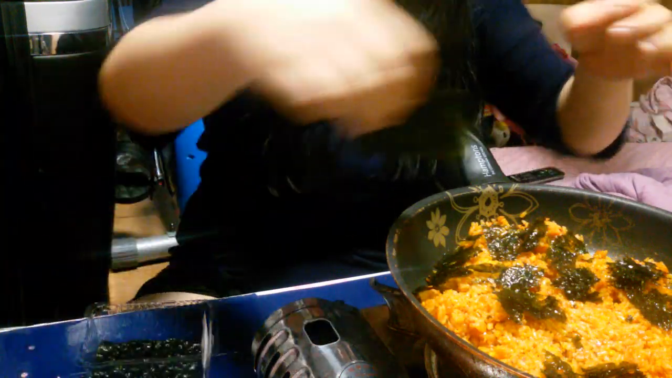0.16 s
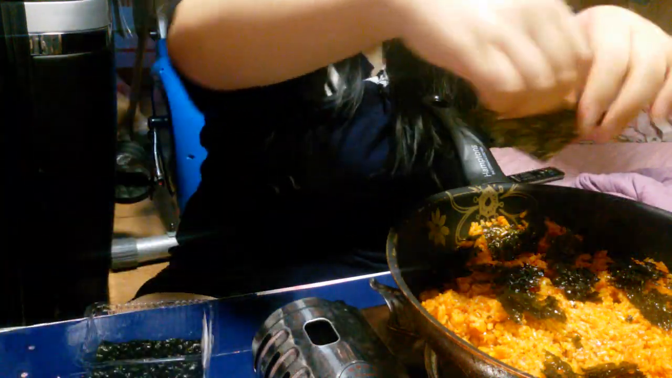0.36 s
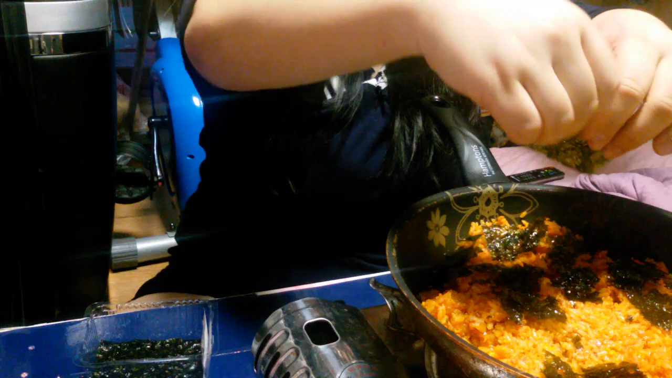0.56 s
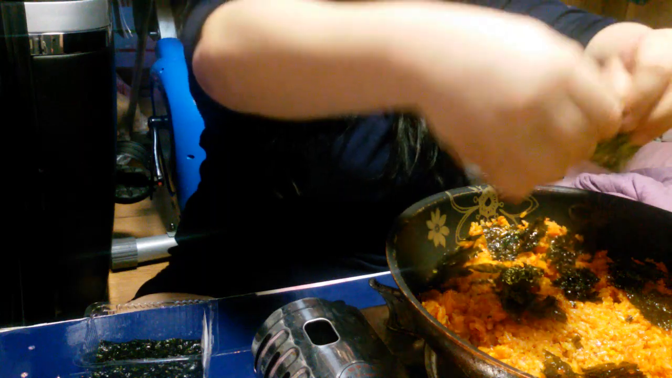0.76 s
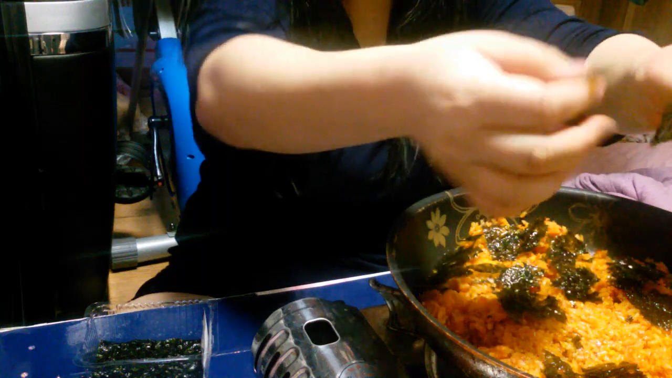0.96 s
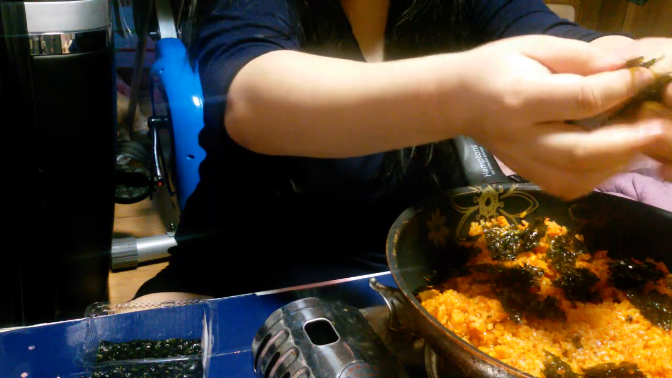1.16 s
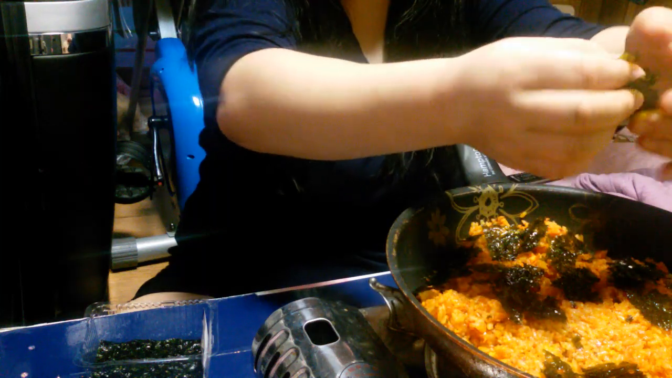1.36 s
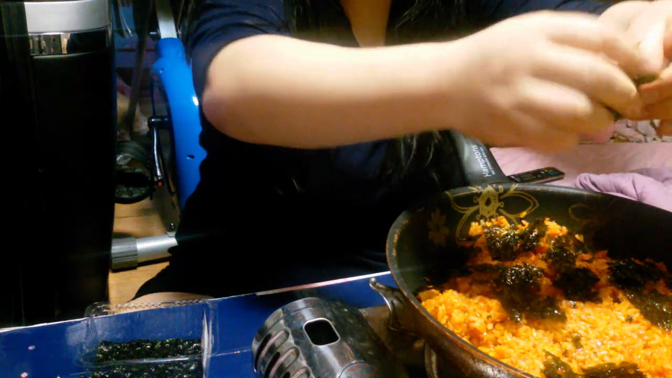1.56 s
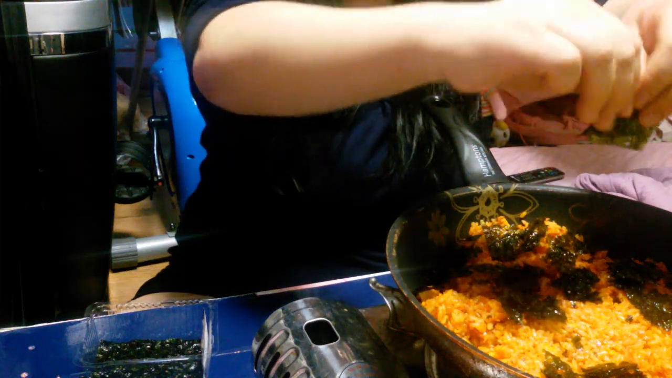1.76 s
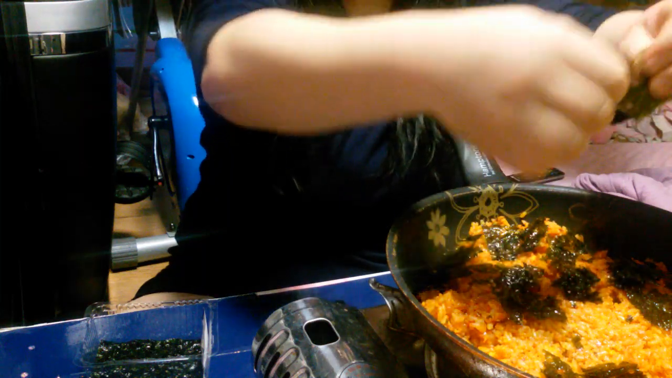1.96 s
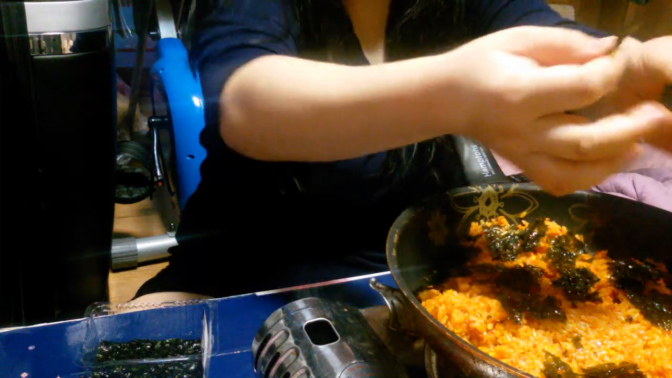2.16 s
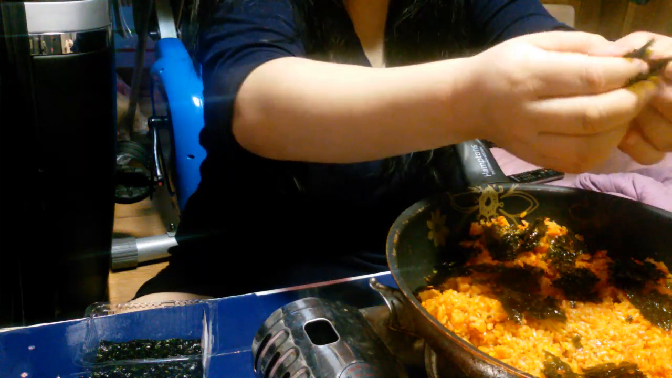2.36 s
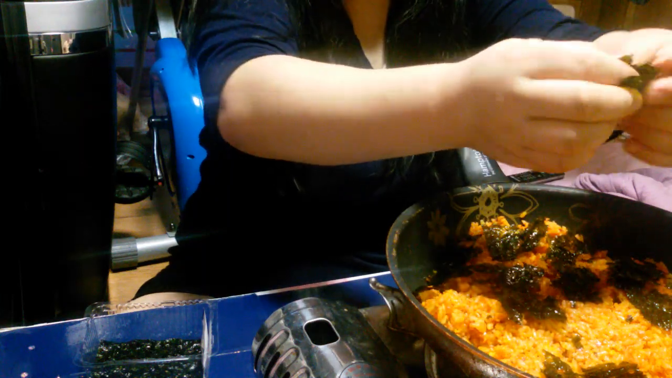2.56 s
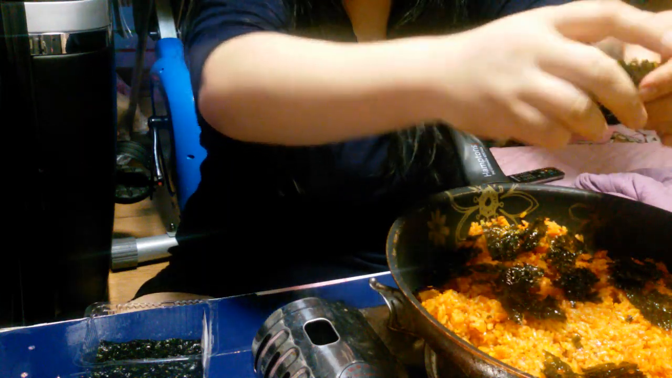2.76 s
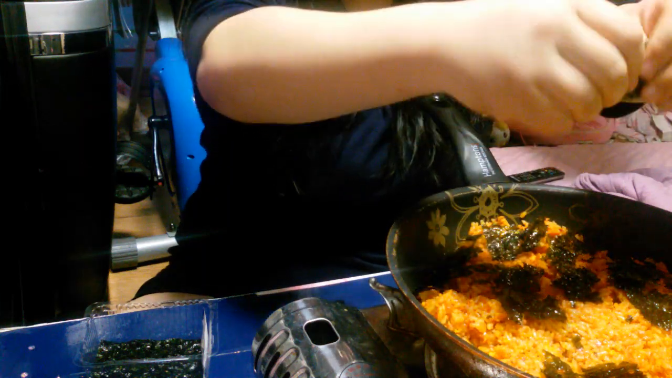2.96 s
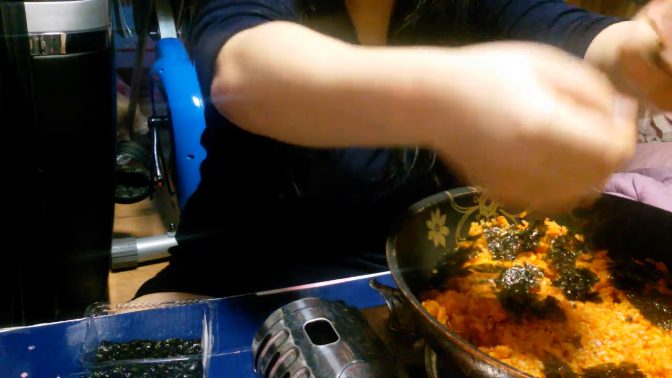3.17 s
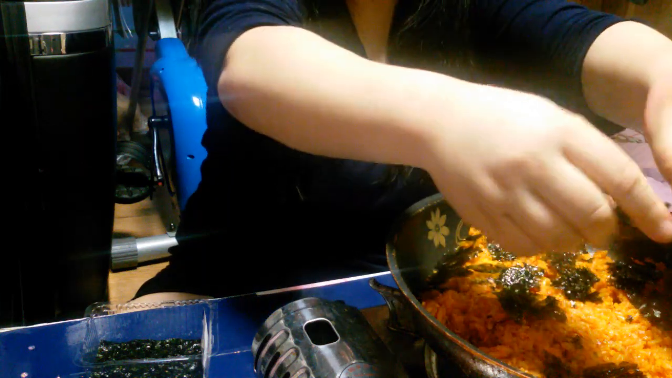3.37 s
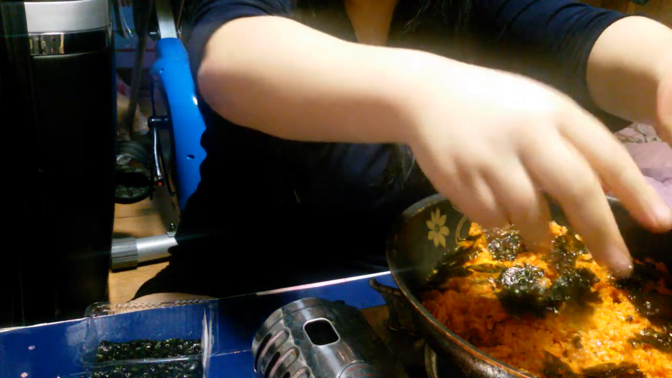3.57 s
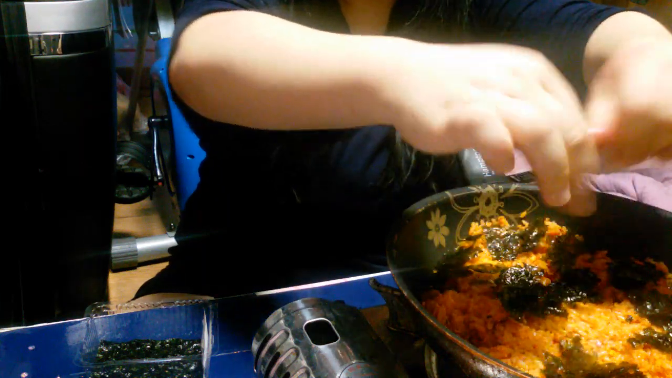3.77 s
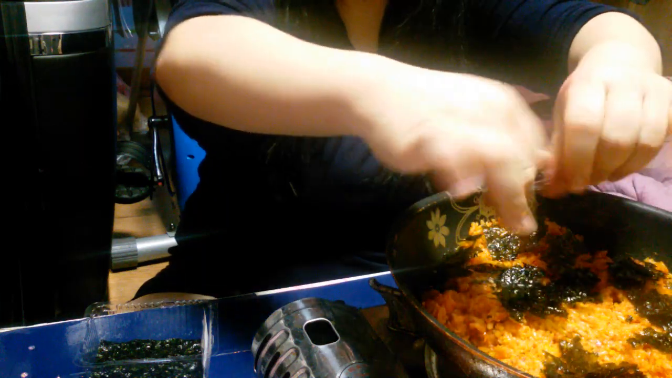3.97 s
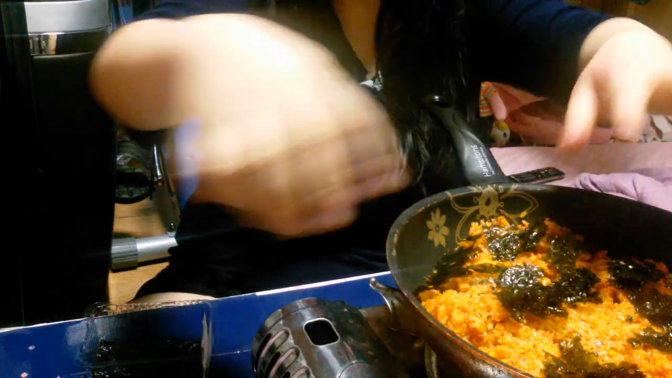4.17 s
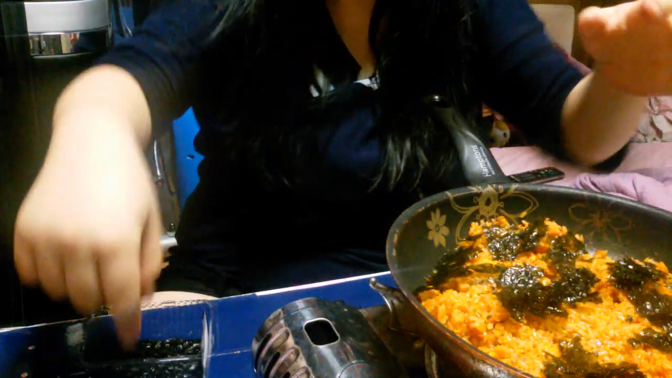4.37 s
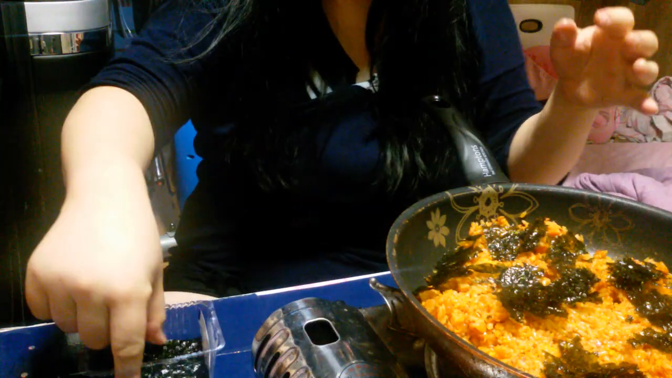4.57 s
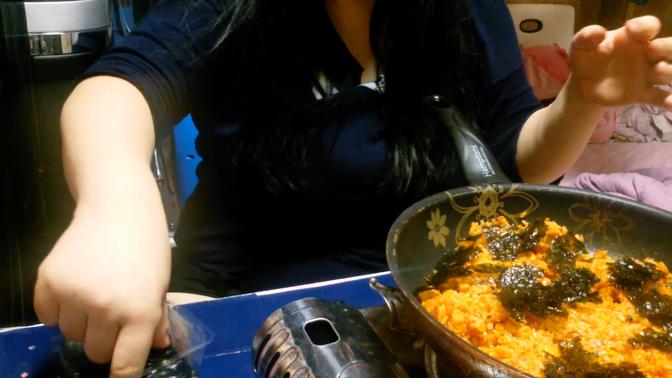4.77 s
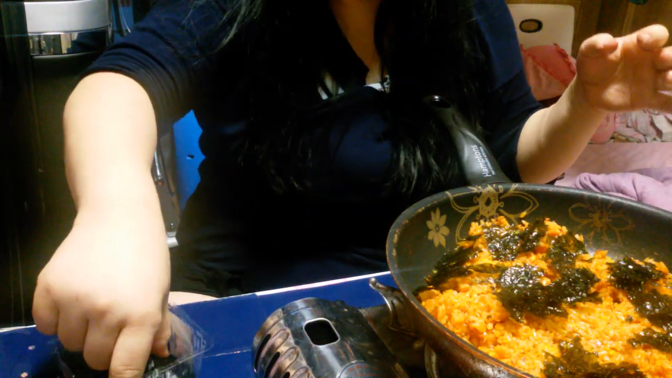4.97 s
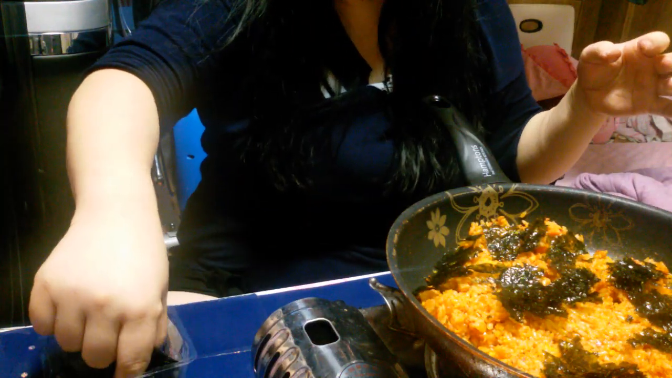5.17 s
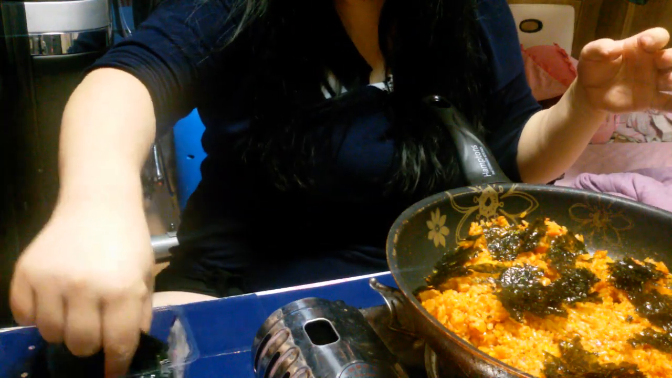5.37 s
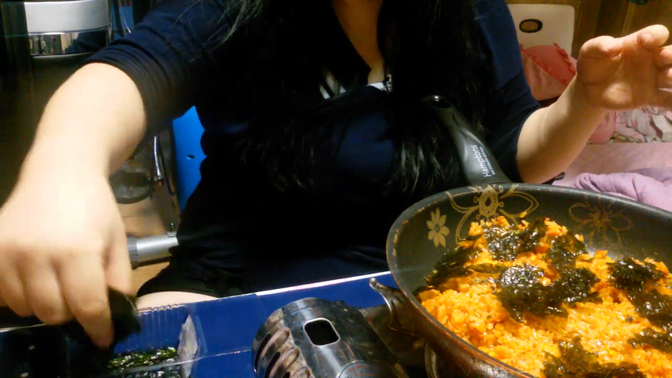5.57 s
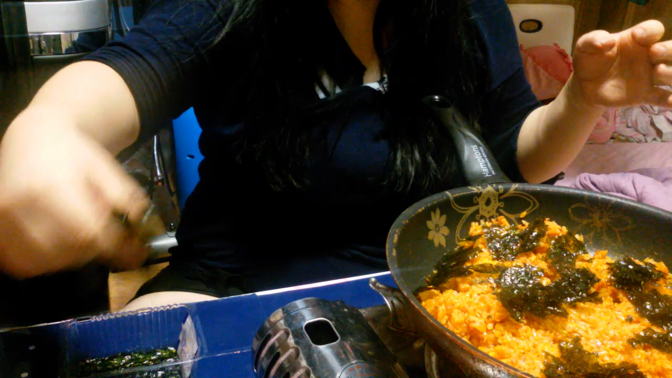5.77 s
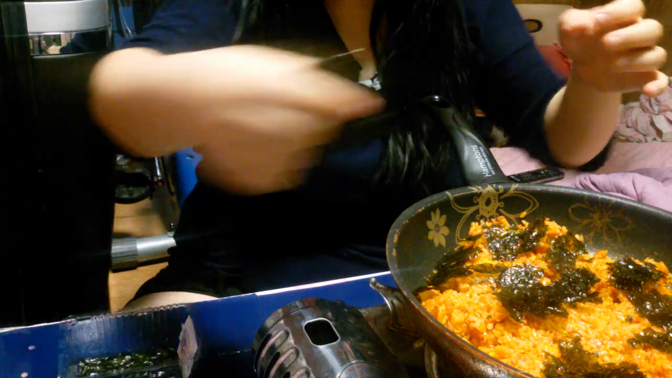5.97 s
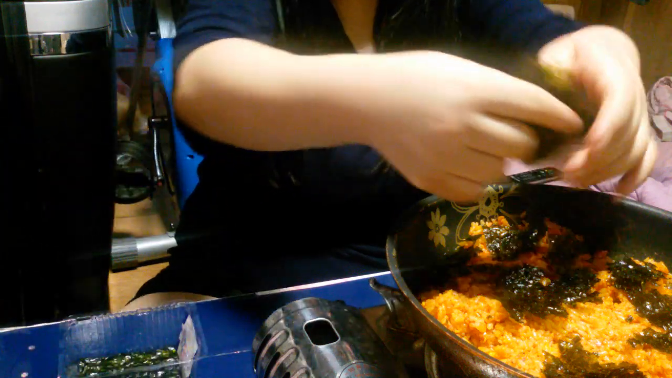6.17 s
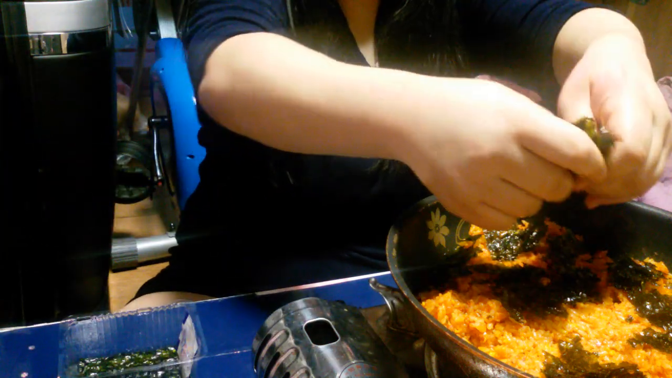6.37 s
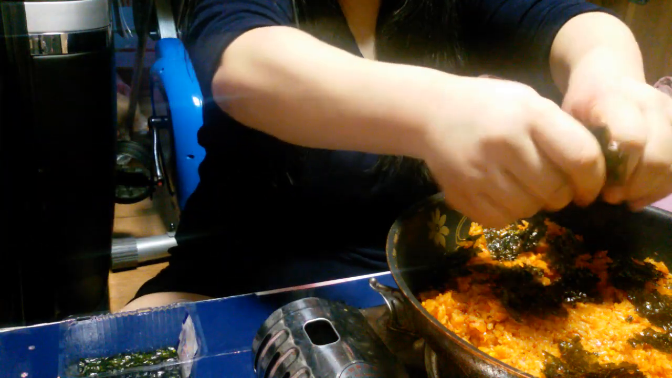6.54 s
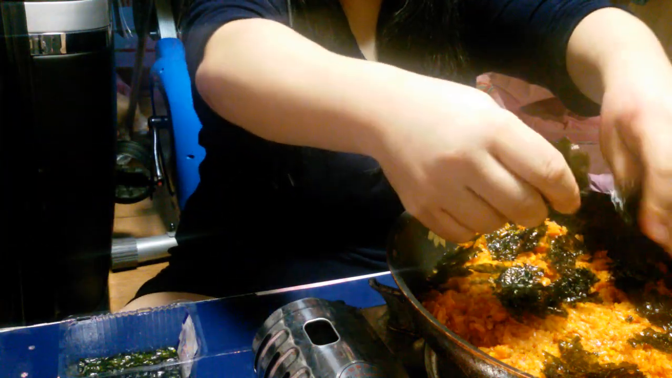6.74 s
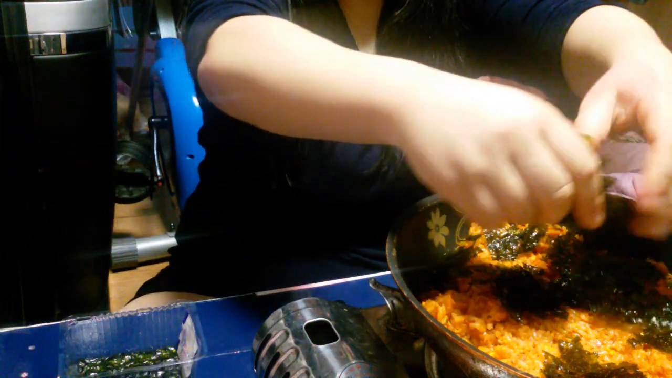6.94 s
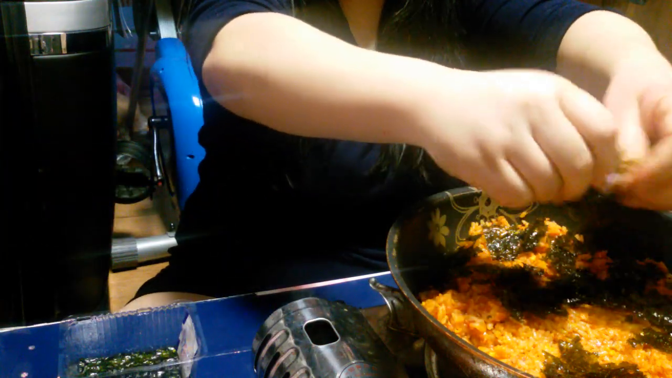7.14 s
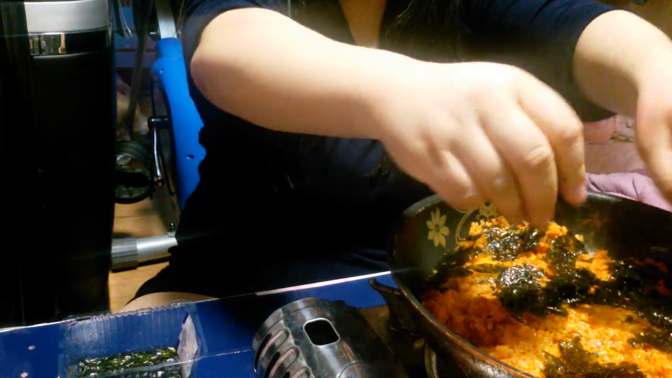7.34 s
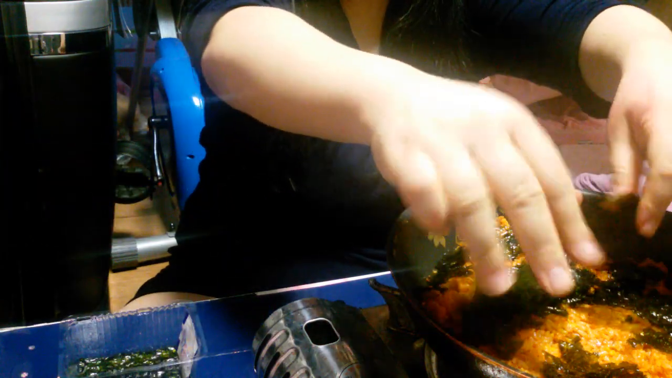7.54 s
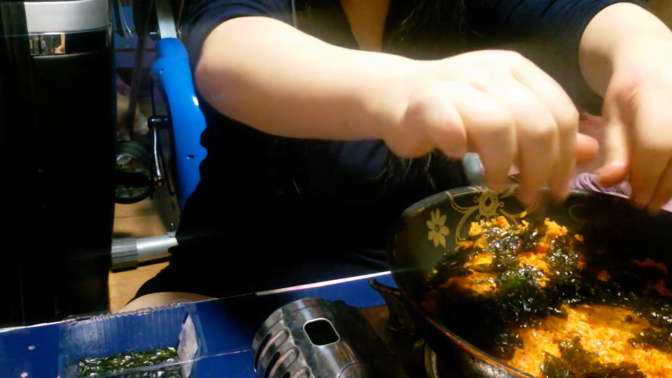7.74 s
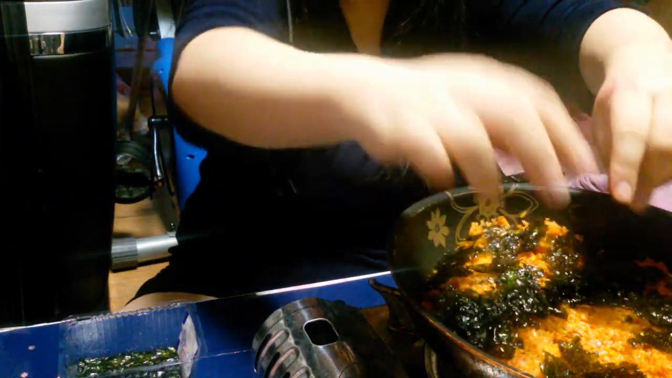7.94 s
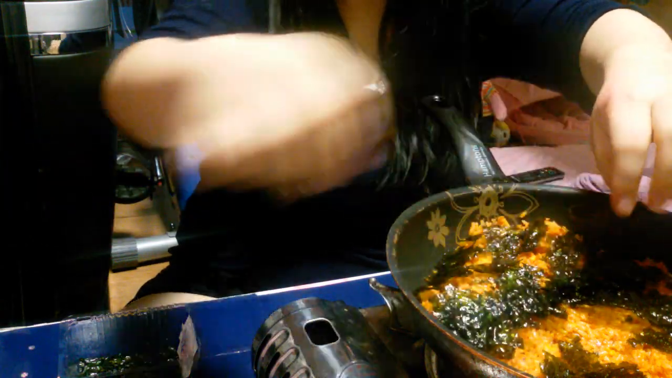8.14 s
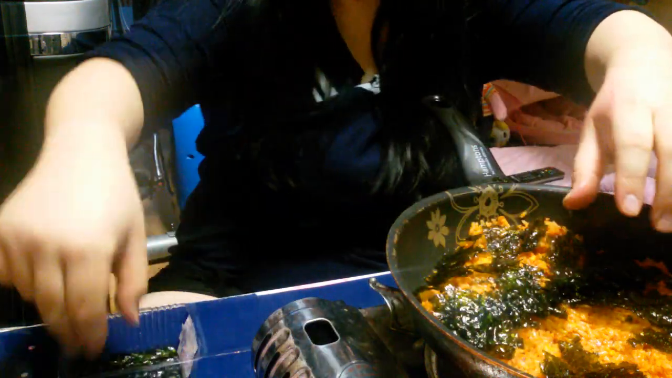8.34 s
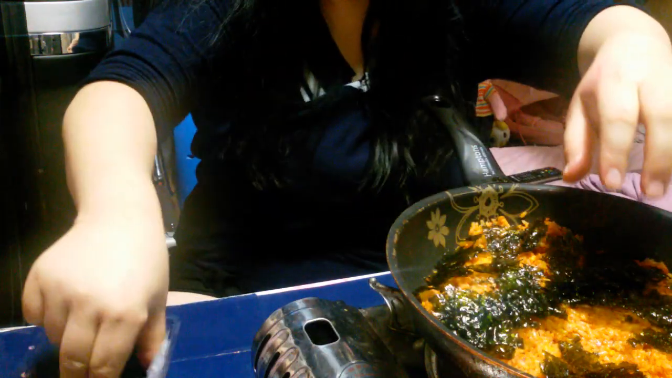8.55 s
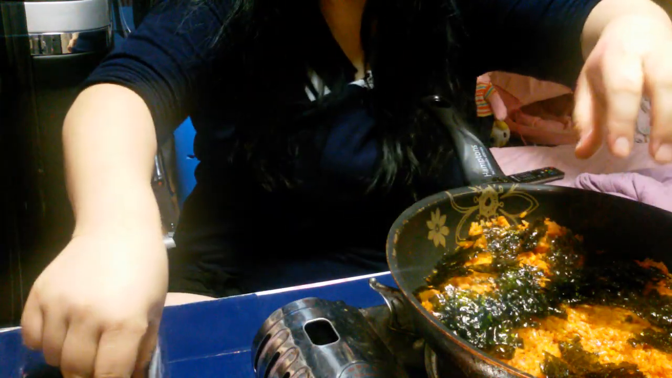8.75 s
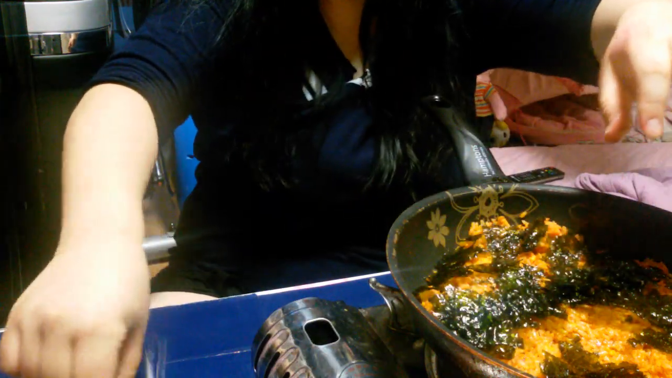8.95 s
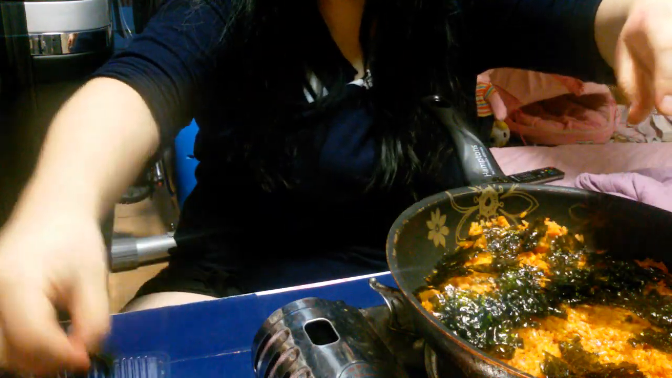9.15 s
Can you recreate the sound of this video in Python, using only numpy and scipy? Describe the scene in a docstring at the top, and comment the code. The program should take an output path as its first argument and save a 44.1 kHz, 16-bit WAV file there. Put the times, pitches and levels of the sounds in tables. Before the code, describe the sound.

Fingers squeeze crisp, paper-thin seaweed, giving short crunchy bursts with crisp single cracks, at first moderate. The hand then fumbles in a light plastic tray on a table, with crinkling, small hollow knocks and low table rumble. A second, stronger round of crunching follows, then a pause and more tray rustling. Close mono pickup, short room tail, quiet hiss, faint hum and a high unsteady whistle.

```python
"""Crisp dried seaweed is crumbled by hand over a pan in a small kitchen, squeeze by squeeze: crackles and snaps.
Twice the hand goes back to a thin plastic tray on the table, bumps it and rustles in it for the next sheet.
Breaks are short noise bursts with a ringing flake; the tray is a set of ringing modes set off by pushes.
A faint ring, table rumble, an unsteady electronic whine, hums and low room noise lie behind; the sound is mono."""
import sys
import numpy as np
from scipy import signal
from scipy.fft import rfft, irfft
from scipy.io import wavfile
from scipy.ndimage import uniform_filter1d, map_coordinates

SR = 44100
rng = np.random.default_rng(int(sys.argv[2]) if len(sys.argv) > 2 else 0)


def store_wav(level_fs):
    """Save 16-bit WAV to argv[1]."""
    pcm = np.round(np.clip(np.atleast_2d(level_fs), -1, 1) * 32767)
    wavfile.write(sys.argv[1], SR, pcm.T.astype(np.int16))


N = 406161   # length in samples
TIME = np.arange(N) / SR   # seconds


def from_db(db):
    """Decibels to gain."""
    return 10 ** (np.asarray(db) / 20)


def rms_one(x):
    """Scale to an rms of 1."""
    return x / np.sqrt(np.mean(x ** 2) + 1e-20)


def white_noise():
    """Plain hiss with an rms of about 1."""
    return rng.standard_normal(N)


def drift(rate, size=16):
    """A smooth random wander with an rms of 1 that changes about rate times a second."""
    knots = rng.standard_normal(int(N / SR * rate) + 2)
    steps = TIME[::size]
    curve = map_coordinates(knots, [steps * rate], order=2, mode="nearest")
    return rms_one(np.interp(TIME, steps, curve))


def through(x, response):
    """Play x through a response (convolution), so each click sets the response off."""
    return signal.oaconvolve(x, response)[:N]


def split(x, hz, order=2):
    """The parts below and above a frequency."""
    low = signal.sosfilt(signal.butter(order, hz, fs=SR, output="sos"), x)
    high = signal.sosfilt(signal.butter(order, hz, "high", fs=SR, output="sos"), x)
    return low, high


def colour(x, spectrum, size=4096):
    """Filter with the shape of a spectrum, acting as early as possible; white noise keeps its power."""
    hz, db = np.transpose(spectrum)
    grid = np.linspace(1, SR / 2, size // 2 + 1)
    gain = from_db(np.interp(np.log(grid), np.log(hz), db))
    # folding the cepstrum puts the energy at the start (minimum phase)
    cepstrum = irfft(np.log(gain))
    response = irfft(np.exp(rfft(2 * cepstrum[:size // 2], size)))
    return through(x, response / np.linalg.norm(response))


def dying_noise(t60):
    """Noise that falls by 60 dB in t60 seconds; energy 1."""
    t = TIME[:SR // 2]
    burst = rng.standard_normal(len(t)) * from_db(-60 * t / t60)
    return burst / np.linalg.norm(burst)


def ring(x, hz, t60):
    """A resonance: a unit click sets off a sine from height 1 that falls by 60 dB in t60 seconds."""
    shrink = from_db(-60 / (t60 * SR))   # per sample
    turn = 2 * np.pi * min(hz, SR / 2.3) / SR   # radians per sample
    feedback = [1, -2 * shrink * np.cos(turn), shrink ** 2]
    return signal.lfilter([0, np.sin(turn)], feedback, x + 1e-18)


def fracture(hz, length_s, cycles=4.6, ring_db=-10, size=768):
    """One break: an abrupt crack, a brief flutter of the sheet and a few cycles of the freed flake; energy 1."""
    flutter = from_db(-9) * dying_noise(.016)
    crack = (dying_noise(length_s) + flutter)[:size]
    sound = crack + from_db(ring_db) * ring(crack, hz, cycles / hz)
    return sound / np.linalg.norm(sound)


def presses(rows, rise_db_per_s, fall_db_per_s):
    """Gain over time of hand movements (start, hold, dB): each swells, holds and dies away; the loudest wins."""
    t = TIME[::32]
    each = []
    for s, hold, db in rows:
        rise = rise_db_per_s * np.maximum(s - t, 0)
        fall = fall_db_per_s * np.maximum(t - s - hold, 0)
        each.append(db - rise - fall)
    return from_db(np.interp(TIME, t, np.max(each, axis=0).clip(-200)))


def crackle(gain, per_s, growth, spread_db, clump_db, length_s, count=20):
    """Tiny breaks in clumps, on flakes of many sizes; a harder squeeze makes them denser. Level about 1."""
    rate = per_s * (gain / from_db(-35) + 1e-6) ** growth   # per_s holds at -35 dB, before clumping
    born = rng.random(N) < rate * from_db(clump_db * drift(160)) / SR
    strength = from_db(spread_db * np.minimum(rng.exponential(1, N), 3))
    clicks = born * strength * rng.choice([-1, 1], N)
    # even out the level over 25 ms, so that density and loudness stay separate
    clicks = clicks / np.sqrt(np.abs(uniform_filter1d(clicks ** 2, size=1100)) + 4e-3)
    flake = rng.integers(0, count, N)
    out = 0
    for k, hz in enumerate(np.geomspace(1800, 12000, count)):
        out = out + through(clicks * (flake == k), fracture(hz, length_s))
    return out


def small_snaps(per_s, spread_db, length_s, count=8):
    """Lesser cracks at uneven intervals, standing out of the crackle; rms 1."""
    draws = rng.random((int(N / SR * per_s), 3))   # timing, strength and pitch of each crack
    at = ((np.arange(len(draws)) + draws[:, 0]) / per_s * SR).astype(int).clip(0, N - 1)
    pitch = (draws[:, 2] * count).astype(int)
    out = 0
    for k, hz in enumerate(np.geomspace(2500, 9000, count)):
        clicks = np.zeros(N)
        clicks[at] = from_db(spread_db * draws[:, 1]) * (pitch == k)
        out = out + through(clicks, fracture(hz, length_s))
    return rms_one(out)


# The fingers squeeze the sheets. Each row: start in seconds, hold in seconds, level in dB before the
# mix levels below, fine splinters against coarse breaks in dB before the same.
SQUEEZES = [(0.225, 0.015, -60.5, -6), (0.506, 0.019, -53, -10), (0.596, 0.074, -51, -8),
            (0.678, 0.026, -46, -10), (0.756, 0.065, -41, -7.5), (0.854, 0.055, -39, -11),
            (1.278, 0.09, -61, -9), (1.533, .02, -56.5, -7), (1.568, 0.0089, -47.5, -4),
            (1.636, 0.028, -49, -7), (1.83, 0.14, -53, -5.5), (1.983, .015, -44, 1),
            (2.055, 0.041, -45, -6), (2.222, 0.026, -60.5, -2), (2.395, 0.17, -55, -4),
            (2.47, .02, -50, -7), (2.668, 0.096, -54, -1), (2.76, 0.043, -40, -6.5), (2.92, 0.11, -52.5, 0),
            (3.022, 0.1, -41, -2.5), (3.249, 0.071, -53, -1.5), (3.466, .02, -59, -4.5),
            (6.148, 0.033, -47.5, -8), (6.22, .04, -48, -5), (6.295, 0.039, -34.5, -7.5),
            (6.375, .06, -39.5, -3), (6.464, 0.11, -34, -5), (6.55, 0.07, -30, -5.5),
            (6.69, 0.067, -47, -14), (6.774, 0.084, -41, -3), (6.894, 0.21, -53, -7),
            (7.123, 0.02, -38, -6.5), (7.192, 0.041, -34.5, -7), (7.398, 0.018, -36, -3.5),
            (7.5, .02, -51.5, -10), (7.585, 0.16, -61.5, -10), (7.76, .025, -57, -6)]
SQUEEZE_RISE_DB_PER_S, SQUEEZE_FALL_DB_PER_S = 650, 299   # pressure builds fast and lets go more slowly
# Tone of breaking seaweed, also used by the snaps. Each row: frequency in Hz, relative strength in dB.
SEAWEED = [(100, -32), (300, -20.5), (600, -21.5), (1080, -8.5), (1450, -12), (2200, -5), (3000, -5.5),
           (4200, -1.5), (5200, 5), (6500, 2.5), (10000, -1.5), (14500, -5.5)]
# Tone of fingers rubbing. Each row: frequency in Hz, relative strength in dB.
FINGERS = [(25, -1), (60, 8), (180, 13), (350, 9.5), (700, 10.5), (2000, -43)]


def crumbling(coarse_db=-1, fine_db=6, fine_hz=7000, finger_db=-43, cracks_db=-3):
    """The sheets break into coarse pieces and fine splinters; the fingers rub dully against each other."""
    s, hold, db, splinter_db = np.transpose(SQUEEZES)
    coarse = presses(zip(s, hold, db), SQUEEZE_RISE_DB_PER_S, SQUEEZE_FALL_DB_PER_S)
    fine = presses(zip(s, hold, db + splinter_db), SQUEEZE_RISE_DB_PER_S, SQUEEZE_FALL_DB_PER_S)
    breaks = crackle(coarse, per_s=2200, growth=.5, spread_db=5.7, clump_db=5.5, length_s=.0018)
    cracks = small_snaps(per_s=85, spread_db=14, length_s=.0045)
    seaweed = colour(breaks + from_db(cracks_db) * cracks, SEAWEED)
    low, high = split(seaweed, fine_hz, order=3)
    # the square root lets the rub grow more gently than the breaks
    rub = from_db(finger_db) * np.sqrt(coarse) * colour(white_noise(), FINGERS)
    return from_db(coarse_db) * coarse * low + from_db(fine_db) * fine * high + rub


# Single fractures that stand out. Each row: time in seconds, strength in dB before the shared snap_db
# and the weight for length, centre in Hz.
SNAPS = [(.6364, -33, 6100), (0.729, -40, 3300), (0.771, -13, 5440), (.7815, -23, 4970),
         (0.8126, -15, 4760), (0.8199, -25, 3500), (.829, -14.5, 4220), (.8809, -16, 5140),
         (0.8941, -15.5, 4900), (1.0367, -30, 6600), (1.5753, -26, 9100), (1.6526, -30, 4750),
         (1.9533, -17, 5250), (1.9842, -12.5, 5250), (1.9911, -14, 5260), (2.0015, -12.5, 5130),
         (2.035, -29, 5500), (2.0547, -25.5, 1990), (2.4752, -29, 5900), (2.5617, -29, 8800),
         (2.7019, -16, 7600), (2.7818, -18, 8940), (2.8963, -32, 10000), (2.9683, -18.5, 6100),
         (3.026, -17.5, 5900), (3.0486, -11, 7400), (3.0912, -16, 7450), (3.1117, -16.5, 6400),
         (3.9838, -45, 9000), (4.5661, -29, 2600), (4.5797, -31, 3670), (5.1156, -19.5, 4270),
         (5.1922, -21, 3680), (5.266, -13.5, 4550), (5.288, -18.5, 4500), (5.3162, -13.5, 5230),
         (5.4841, -19, 7700), (5.5032, -16.5, 5100), (5.557, -25, 7600), (5.6541, -17.5, 5800),
         (6.0347, -27, 5300), (6.1295, -21.5, 6900), (6.1546, -26.5, 6070), (6.2283, -17.5, 6100),
         (6.263, -20, 5800), (6.322, -11.5, 6300), (6.4418, -17, 6500), (6.567, -10, 5900),
         (6.6157, -9, 4670), (6.7476, -20, 7160), (7.0101, -32, 6200), (7.06, -28, 6600),
         (7.2538, -11.5, 9100), (7.2916, -14.5, 10100), (7.401, -32, 5900), (7.426, -18, 4900),
         (7.5172, -22.5, 7100), (7.704, -44, 3500), (7.813, -43, 3080), (8.478, -30, 2020),
         (8.5555, -19, 4400), (8.8274, -20, 4350), (8.8758, -13, 5300), (8.9094, -20, 4350),
         (9.0104, -19, 5900), (9.1612, -18, 5350)]
SNAP_S, SNAP_SHORTENING = 0.0087, 1   # decay (t60) at bright_hz; power by which higher ones are shorter


def snaps(snap_db=-16.5, bright_hz=5500, brightening=7.4):
    """Cracks that run through a whole sheet at once; small, stiff pieces break faster and give more treble."""
    out = np.zeros(N + SR)
    sheet = colour(signal.unit_impulse(1024), SEAWEED)[:512]
    for s, db, hz in SNAPS:
        length_s = SNAP_S * (bright_hz / hz) ** SNAP_SHORTENING
        low, high = split(fracture(hz, length_s), 5200, order=1)
        sound = np.convolve(low + (hz / bright_hz) ** brightening * high, sheet)
        strength = from_db(db + snap_db) * np.sqrt(length_s * SR)   # a longer crack frees more energy
        at = int(s * SR)
        out[at:at + len(sound)] += strength * sound / np.linalg.norm(sound)
    return out[:N]


# The fingers push through the tray. Each row: start in seconds, hold in seconds, level in dB before
# the shared rustle_db, extra treble in dB.
STROKES = [(4.571, 0.078, -50.5, -11), (4.693, 0.041, -48.5, 2.5), (4.797, 0.085, -40.5, -3.5),
           (4.87, 0.034, -39.5, 5), (4.982, 0.045, -45, 3.5), (5.066, .06, -40, 3),
           (5.108, 0.031, -34, 1.5), (5.244, 0.052, -38, 4), (5.351, 0.048, -39, 5), (5.477, .065, -45, 5),
           (5.656, 0.0024, -47, 2), (5.794, 0.0067, -54.5, 6), (8.485, 0.005, -43.5, -26),
           (8.558, 0.024, -35, 0), (8.66, 0.098, -50.5, 5.5), (8.731, .025, -37, 0), (8.822, 0.25, -42, 1),
           (8.851, 0.054, -36, 4), (9.152, 0.059, -39, -1)]
STROKE_RISE_DB_PER_S, STROKE_FALL_DB_PER_S = 895, 296
# Tone of thin plastic, also used by the tray bumps. Each row: frequency in Hz, relative strength in dB.
PLASTIC = [(100, -34.5), (300, -12.5), (650, -12.5), (1400, -9.5), (2200, -10), (3500, -2), (5000, -0.5),
           (7500, -6), (10000, -11), (14500, -17.5)]


def rustling(rustle_db=-1, creases_db=-6, treble_hz=6500):
    """Thin plastic and sheets crinkle densely under the searching fingers; the first touches are duller."""
    s, hold, db, treble_db = np.transpose(STROKES)
    gain = presses(zip(s, hold, db), STROKE_RISE_DB_PER_S, STROKE_FALL_DB_PER_S)
    treble = presses(zip(s, hold, db + treble_db), STROKE_RISE_DB_PER_S, STROKE_FALL_DB_PER_S)
    crinkles = crackle(gain, per_s=3000, growth=.4, spread_db=5.2, clump_db=4.5, length_s=.0022)
    creases = small_snaps(per_s=55, spread_db=14, length_s=.005)
    plastic = colour(crinkles + from_db(creases_db) * creases, PLASTIC)
    low, high = split(plastic, treble_hz, order=3)
    return from_db(rustle_db) * (gain * low + treble * high)


# The hand bumps the tray. Each row: time in seconds, strength in dB before the shared bump_db,
# frequency in Hz that the touched spot favours.
BUMPS = [(4.579, -34, 395), (4.824, -28, 390), (4.844, -27, 262), (4.947, -35, 210), (5.116, -32, 295),
         (5.53, -34.5, 240), (8.481, -29.5, 302), (8.503, -34.5, 450), (8.553, -27.5, 336),
         (8.594, -27, 280), (8.748, -36, 456), (9.174, -29.5, 406), (9.192, -36, 400)]
# Ways the tray rings on the table. Each row: frequency in Hz, relative level in dB,
# time in seconds to fall by 60 dB.
TRAY_MODES = [(212.6, -11, 0.29), (270, -11, 0.057), (314, -10, 0.024), (377, -5.5, 0.083),
              (450, -1.5, 0.11), (536, -1, 0.031), (690, -2, 0.038), (1204, -1, 0.063), (1826, 3.5, 0.031)]


def tray_bumps(bump_db=-8, scuff_db=0, scuff_t60=0.1, tick_db=3, reach_octaves=0.62, lowest_hz=160):
    """Each bump is a push and a short scuff; the touched spot decides which of the tray's modes ring most."""
    s, db, spot_hz = np.transpose(BUMPS)
    at = (s * SR).astype(int)
    fade = dying_noise(scuff_t60) ** 2
    grit = white_noise()

    def contact(strengths):
        """Pushes and the scuffs that follow them."""
        pushes = np.zeros(N)
        pushes[at] = from_db(db + bump_db) * strengths
        scuff = np.sqrt(np.abs(through(pushes ** 2, fade))) * grit
        return pushes, scuff

    body = 0
    for hz, mode_db, t60 in TRAY_MODES:
        octaves_away = np.log2(hz / spot_hz)
        pushes, scuff = contact(0.33 + np.exp(-(octaves_away / reach_octaves) ** 2))
        body = body + from_db(mode_db) * ring(pushes + from_db(scuff_db) * scuff, hz, t60)
    tick = colour(contact(0.81)[1], PLASTIC)
    return split(body, lowest_hz)[1] + from_db(tick_db) * tick


# The hand leans on the table. Each row: start in seconds, hold in seconds, level in dB.
LEANS = [(4.83, 0.32, -50.5), (5.11, 0.044, -44), (5.2, 0.41, -54), (8.57, .25, -69), (8.83, .38, -57.5)]
LEAN_RISE_DB_PER_S, LEAN_FALL_DB_PER_S = 500, 121
# Tone of the shaken table. Each row: frequency in Hz, relative strength in dB.
RUMBLE = [(20, -32), (35, -9), (70, 4), (120, -7.5), (200, -8), (400, -13), (1000, -67)]


def table_rumble():
    """The rubbing hand shakes the table: low noise that follows the hand's pressure."""
    pressure = presses(LEANS, LEAN_RISE_DB_PER_S, LEAN_FALL_DB_PER_S)
    return pressure * colour(white_noise(), RUMBLE)


def faint_ring(hz=1540, ring_db=-68):
    """A faint, hazy tone, made by noise in a resonance, swells and fades once."""
    swell = np.exp(-((TIME - 2.2) / .12) ** 2)
    return from_db(ring_db) * swell * rms_one(ring(white_noise(), hz, 0.043))


def whine(rest_hz=6400, wander_hz=25, sag_hz=175, jitter_hz=45, whine_db=-59.5, flicker_db=0.6):
    """An electronic whistle whose pitch keeps sagging for a few milliseconds and springing back."""
    sag = np.minimum(np.maximum(drift(230) + .15, 0) ** 2, 2.4)
    hz = rest_hz + wander_hz * drift(7.9) - sag_hz * sag + jitter_hz * drift(760)
    level = from_db(whine_db + flicker_db * drift(60))
    return level * np.sqrt(2) * np.sin(2 * np.pi * np.cumsum(hz) / SR)


# Appliance tones of steady level. Each row: frequency in Hz, rms level in dB.
HUM = [(120, -70.5), (135, -75), (276, -76.5), (409, -72.5)]
# Tone of the room noise. Each row: frequency in Hz, relative strength in dB.
ROOM_NOISE = [(25, -7), (55, -1.5), (130, -3.5), (170, -0.5), (400, -4.5), (700, -7), (1250, -10),
              (1800, -12), (3000, -15), (5000, -13.5), (6400, -9), (7400, -17), (11000, -17.5),
              (13200, -15), (15000, -25)]


def background(noise_db=-61.0):
    """Steady room noise with a few faint hums whose phase wavers."""
    hum = 0
    for hz, db in HUM:
        phase = 2 * np.pi * hz * TIME + 1.14 * drift(27)
        hum = hum + from_db(db) * np.sqrt(2) * np.sin(phase)
    return hum + from_db(noise_db) * colour(white_noise(), ROOM_NOISE)


# Tone of the room's echo. Each row: frequency in Hz, relative strength in dB.
ROOM_COLOUR = [(100, 9), (1000, 0.5), (2500, -0.5), (4000, -1.5), (5200, 0.5), (7500, -2), (14000, -1.5)]


def kitchen(x, wet_db=-0.5, t60=0.17, count=3):
    """A short diffuse tail; as the hands move, the sound takes ever different paths through the room."""
    paths = np.array([drift(40) for _ in range(count)])
    paths = paths / np.linalg.norm(paths, axis=0)   # total power stays the same
    build = 1 - np.exp(-(TIME[:SR // 2] / .005) ** 2)   # the tail builds up over some 5 ms
    wet = sum(through(x * path, dying_noise(t60) * build) for path in paths)
    return x + from_db(wet_db) * colour(wet, ROOM_COLOUR)


def scene():
    """Seaweed and rustling in the room, then tray, table and background; both channels alike."""
    hands = kitchen(crumbling() + rustling() + snaps())
    mono = hands + tray_bumps() + table_rumble() + faint_ring() + whine() + background()
    return np.array([mono, mono])


CUTOFF_HZ = 14700


def record(dry):
    """A steep filter removes the top of the treble."""
    return signal.sosfilt(signal.ellip(12, .2, 80, CUTOFF_HZ, fs=SR, output="sos"), dry)


dry = scene()
out = record(dry)
store_wav(out)
```